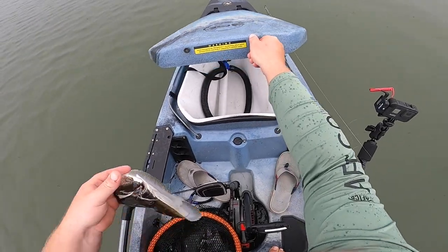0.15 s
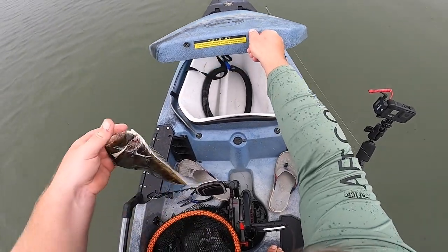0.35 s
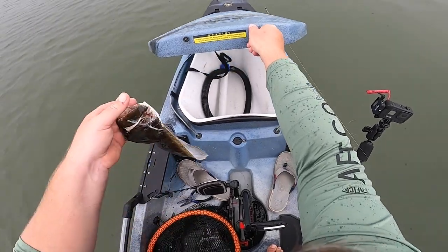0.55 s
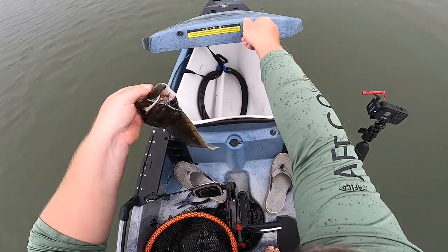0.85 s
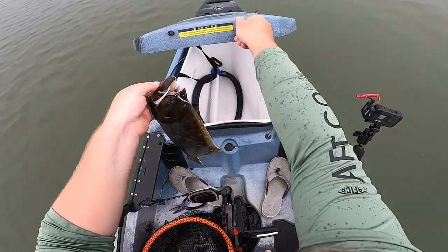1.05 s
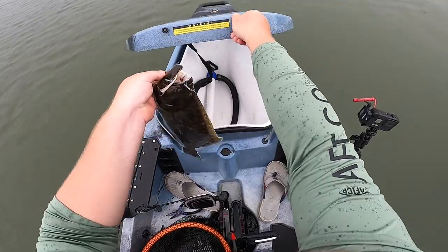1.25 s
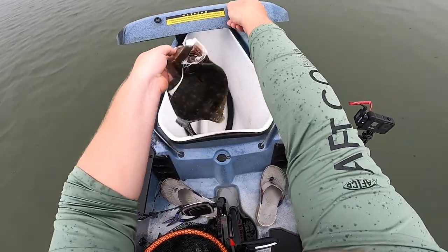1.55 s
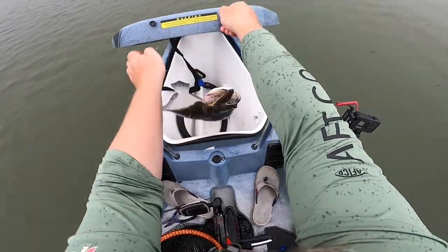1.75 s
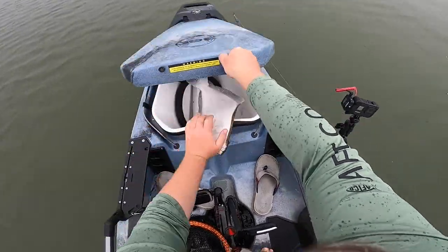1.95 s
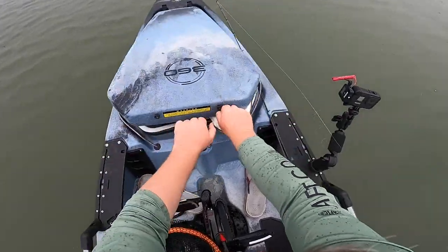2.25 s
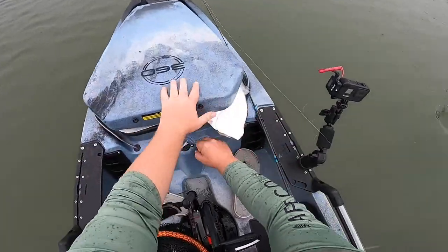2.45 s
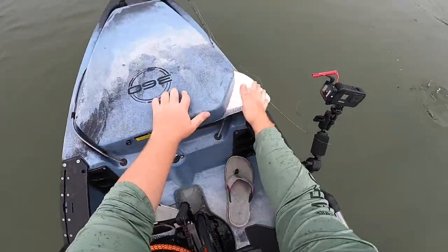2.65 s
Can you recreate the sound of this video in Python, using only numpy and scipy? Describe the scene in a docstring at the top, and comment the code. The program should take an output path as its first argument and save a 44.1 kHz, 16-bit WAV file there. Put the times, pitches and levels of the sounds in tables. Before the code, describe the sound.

A fish thumps into a plastic kayak hatch, close by. At first there is only a low, engine-like drone, which continues throughout, with faint water ticks and sleeve rustle. At about 1.7 seconds the fish lands with a hollow boom and wet, crackling slaps. From 2 seconds the lid bumps and rubs on the rim in quick, hollow knocks, clacking shut at about 2.7 seconds.

```python
"""A wet fish drops into the front hatch of a plastic kayak and flops about.
Its skin splats and crackles, and each blow booms in the hollow hull. The lid is lowered, bumps
and rubs on the rim, which makes it ring, and clacks shut. Sleeves rustle faintly before the drop.
All along, a low drone like a far engine lies over calm water that ticks on the hull."""
import sys
import numpy as np
from scipy import signal
from scipy.fft import rfft, irfft, next_fast_len
from scipy.io import wavfile
from scipy.ndimage import map_coordinates

SR = 44100
rng = np.random.default_rng(int(sys.argv[2]) if len(sys.argv) > 2 else 0)


def digitize_waveform(pressure):
    """Quantize a signal to 16-bit integers and store it at the path in sys.argv[1].

    Rows of a 2-D input are taken as channels; values are limited to [-1, 1].
    """
    field = np.atleast_2d(pressure).T
    bounded = np.clip(field, -1, 1)
    quanta = np.round(bounded * 32767).astype(np.int16)
    wavfile.write(sys.argv[1], SR, quanta)


N = 123479

# The drone. Each row: pitch in Hz, level in dB.
DRONE_TONES = [(47.5, -38), (92, -40.5), (125.5, -38), (329.5, -59)]
# Drips and small handling ticks. Each row: start in seconds, level in dB, pitch in Hz.
DRIPS = [(0.112, -47.5, 5900), (.365, -55.5, 6500), (.433, -52, 1910), (0.971, -53.5, 6800),
         (1.026, -52.5, 6060), (1.391, -44.5, 1660), (1.474, -49.5, 2800), (1.577, -45.5, 1240)]
# Sleeves rustling, the fish sliding, lid and fish rubbing. Each row: time in seconds, level in dB.
RUSTLE_LEVELS = [(.18, -67.5), (.3, -65), (.5, -75), (.72, -72), (.77, -64.5), (.94, -71.5), (1.15, -63),
                 (1.55, -68)]
SLIDE_LEVELS = [(1.59, -68), (1.65, -43.5), (1.69, -51.5), (1.74, -38), (1.82, -45.5), (1.88, -51),
                (1.94, -48), (1.96, -34.5), (2.06, -47.5), (2.105, -37.5), (2.16, -56), (2.25, -42),
                (2.285, -34.5), (2.335, -43.5), (2.41, -36), (2.48, -40), (2.56, -31), (2.625, -40),
                (2.65, -28), (2.7, -48), (2.74, -36.5), (2.8, -30.5)]
RUB_PRESSURE = [(1.69, -85), (1.74, -39), (1.88, -51), (1.94, -49), (1.96, -40), (2.03, -33.5), (2.09, -42),
                (2.17, -47.5), (2.24, -33), (2.39, -37.5), (2.42, -30), (2.52, -28), (2.6, -32.5),
                (2.7, -34), (2.8, -30.5)]
# Wet skin slapping and peeling off plastic. Each row: start in seconds, level in dB, fade in seconds.
# A fade, called t60 in the code, is the time a sound takes to drop by 60 dB.
SKIN_SPLATS = [(1.647, -38.5, 0.038), (1.6593, -37.5, 0.046), (1.7262, -23.5, 0.018), (1.805, -35.5, 0.09),
               (2.0012, -22.5, 0.06), (2.091, -35, 0.11), (2.106, -28.5, 0.033), (2.29, -34.5, 0.11),
               (2.355, -27.5, 0.025), (2.654, -40, 0.055), (2.79, -27.5, 0.048)]
# Sharp cracks of the fish hitting the tub, then lid and rim clacking.
# Each row: start in seconds, level in dB, pitch in Hz, fade in seconds.
SHARP_HITS = [(1.7097, -26.5, 1300, 0.044), (1.7198, -23, 1390, 0.057), (1.7256, -14.5, 1410, 0.022),
              (1.7314, -19, 1400, 0.022), (1.779, -31, 1106, 0.051), (1.8059, -25, 1190, 0.025),
              (1.8155, -24, 1140, 0.028), (1.844, -30, 1680, 0.029), (1.908, -35.5, 920, 0.032),
              (1.9991, -14.5, 2100, 0.028), (2.0, -19.5, 4000, 0.035), (2.063, -39.5, 1900, 0.064),
              (2.1035, -28, 2910, 0.05), (2.2226, -22, 1880, 0.024), (2.273, -20.5, 2800, 0.018),
              (2.291, -26.5, 3920, 0.032), (2.299, -32, 5070, 0.052), (2.3184, -22.5, 2160, 0.013),
              (2.346, -23.5, 1170, 0.045), (2.353, -29.5, 2260, 0.027), (2.3775, -18.5, 2380, 0.014),
              (2.408, -21, 1440, 0.046), (2.461, -24.5, 1470, 0.028), (2.55, -22.5, 2380, 0.023),
              (2.5904, -17.5, 3270, 0.023), (2.7233, -13.5, 2930, 0.029), (2.7245, -8.5, 1490, 0.031),
              (2.7752, -16, 1570, 0.053), (2.7871, -24.5, 3860, 0.017)]
# The fish landing in the tub under the hatch, and the lid bumping on the rim. Each row: start in seconds,
# boom in dB, boom pitch in Hz, boom fade in seconds, heave in dB, knock in dB, knock brightness in Hz.
FISH_FLOPS = [(1.7255, -11.5, 220, 0.097, -24, -12.5, 865), (1.7315, -2, 218, 0.024, -34, -15.5, 1240),
              (1.7425, -8.5, 175.5, 0.19, -10, -25, 900)]
LID_BUMPS = [(1.952, -20, 152, 0.034, -22, -17.5, 1960), (2.013, -30, 220, 0.14, -11, -21, 700),
             (2.096, -24.5, 422, 0.12, -36, -22.5, 1400), (2.229, -10, 192.4, 0.1, -11.5, -15, 800),
             (2.272, -17.5, 307, 0.071, -12.5, -20.5, 880), (2.407, -19, 160, 0.06, -8.5, -14.5, 1500),
             (2.429, -23, 190, .04, -19, -18.5, 1000), (2.4625, -13, 273, 0.07, -7.5, -12, 1440),
             (2.478, -21, 176, 0.066, -24, -14.5, 1110), (2.495, -8.5, 108, 0.08, -8.5, -21, 806),
             (2.519, -15, 190, 0.026, -20, -12, 1030), (2.557, -13, 154.4, 0.11, -23, -15.5, 1100),
             (2.577, -15, 210.5, 0.2, -14, -14, 980), (2.646, -12, 160, 0.16, -14, -17, 750),
             (2.726, -8.5, 139.3, 0.23, -28, -11.5, 394)]
# The notes (modes) of tub and lid. Each row: pitch in Hz, relative level in dB, fade in seconds.
TUB_MODES = [(371, 3.5, 0.047), (457, 2.5, 0.033), (596, 6.5, 0.03), (940, -1, 0.14), (1120, -3, 0.19),
             (1305, 3, 0.11)]
LID_MODES = [(238, -7, 0.11), (340, -2.5, 0.12), (443, -3, 0.062), (502, 0, 0.062), (630, -1.5, 0.12),
             (721, -5.5, 0.06), (848, -4, 0.094), (1029, -3.5, 0.05), (1196, -5.5, 0.029),
             (1440, -12, 0.037), (1526, -2.5, 0.033)]
# Presses and blows that ring one panel of the lid. Each row: start in seconds, level in dB, pitch in Hz.
PANEL_NOTES = [(2.2285, -14, 632), (2.478, -12, 643), (2.5195, -9.5, 633.3), (2.725, -17, 1480)]
# The tone colour of each noise. Each row: frequency in Hz, relative level in dB.
RUMBLE_COLOUR = [(15, -2), (28, 2.5), (60, -6), (80, -1), (135, -2.5), (160, -7.5), (230, -13),
                 (400, -24.5), (600, -39), (1200, -54.5), (3000, -100)]
AIR_COLOUR = [(150, -4), (500, 1), (1300, 7), (2200, -9), (4500, -14.5), (8000, -16), (11000, -39),
              (14000, -51)]
CLOTH_COLOUR = [(500, -15.5), (1400, 4), (3500, -7), (12000, -24.5)]
SWISH_COLOUR = [(2500, -26), (4200, -0.5), (5100, -8), (6100, 1), (7300, -19), (8600, -2.5), (9900, -22)]
SLIDE_COLOUR = [(200, -16.5), (900, 8), (2000, 7.5), (3800, 2.5), (8000, -11.5), (12000, -24), (15500, -31)]
SPRAY_COLOUR = [(300, 6), (1200, 12), (3000, -0.5), (6000, 4.5), (9000, -1.5), (12000, -11.5), (15500, -9)]
HULL_COLOUR = [(20, -2.5), (55, 2), (90, -0.5), (130, 4), (210, -0.5), (300, -19), (600, -54)]
THUD_COLOUR = [(100, -11.5), (300, 9), (1400, 8), (4000, -22.5), (12000, -60)]
# How alike left and right are, far off and close by. Each row: frequency in Hz, likeness (1 is the same).
FAR_LIKENESS = [(25, 0.26), (60, 0.87), (120, 0.99), (500, 0.97), (2000, 0.3), (8000, .2)]
NEAR_LIKENESS = [(100, 0.84), (2000, 0.94), (5000, 0.99), (12000, 0.12)]
# The balance of the two microphones. Each row: frequency in Hz, left minus right in dB.
MIC_BALANCE = [(100, 1), (2500, 0.5), (5500, -0.5), (10000, -4.5), (14000, -7)]

RUMBLE_DB, AIR_DB = -33, -59.5
TICKS_PER_S, TICK_DB, TICK_HZ, TICK_T60 = 8.3, -59, 1900, 0.017
SWISH_S, SWISH_HALF_S, SWISH_DB = 0.63, 0.087, -66.5
CRACKLES_PER_S, SLIPS_PER_S, GRIP_S = 1000, 420, 0.06
HULL_DB, HULL_GROWTH, HULL_REF_DB = 7, 0.89, -8
HEAVE_HZ, HEAVE_T60 = 59.6, 0.14
DECK_DB, DECK_T60, LEFT_LAG_S = -14.5, 0.048, 0.00004
ROLL_OFF_HZ, TOP_HZ = 13550, 15800


def amp(db):
    """Turn decibels into a gain."""
    return 10 ** (np.asarray(db) / 20)


def unit(x):
    """Scale a signal to an average size (rms) of 1."""
    return x / np.sqrt(np.mean(x ** 2) + 1e-20)


def along(points, hz):
    """Read between the rows of a frequency table, on a log scale."""
    freqs, values = np.transpose(points)
    return np.interp(np.log(hz + 1), np.log(freqs + 1), values)


def curve(rows):
    """Join the rows of a time table with straight lines."""
    return np.interp(np.arange(N) / SR, *np.transpose(rows))


def wobble(rate):
    """A smooth curve through `rate` random values a second."""
    return map_coordinates(rng.standard_normal(N // 100), [np.arange(N) * rate / SR])


def filtered(x, response):
    """Scale and delay each frequency of x by response(hz)."""
    n = x.shape[-1]
    padded = next_fast_len(n + SR // 4)
    return irfft(rfft(x, padded) * response(np.fft.rfftfreq(padded, 1 / SR)), padded)[..., :n]


def coloured(x, spectrum):
    """Give x a tone colour."""
    size = 4096
    cepstrum = irfft(np.log(amp(along(spectrum, np.fft.rfftfreq(size, 1 / SR)))))
    cepstrum[1:size // 2] *= 2  # folded so the filter rings only after a click, never before
    cepstrum[size // 2 + 1:] = 0
    kernel = irfft(np.exp(rfft(cepstrum)))
    return signal.fftconvolve(x, kernel / np.linalg.norm(kernel))[:len(x)]


def spread(mid, side, likeness):
    """Mix two unrelated signals into a left and right of the given likeness."""
    def weights(hz):
        turn = np.arccos(np.clip(along(likeness, hz), -1, 1)) / 2
        return np.array([np.cos(turn), np.sin(turn)])
    mid, side = filtered(np.array([mid, side]), weights)
    return np.array([mid + side, mid - side])


def rush(spectrum):
    """Steady, far-off stereo noise."""
    mid, side = [coloured(rng.standard_normal(N), spectrum) for _ in range(2)]
    return unit(spread(mid, side, FAR_LIKENESS))


def add(track, start, sound):
    """Mix a sound into the track at `start` seconds."""
    part = track[max(round(start * SR), 0):][:len(sound)]
    part += sound[:len(part)]


def age():
    """Seconds since a blow, up to a quarter second."""
    return np.arange(SR // 4) / SR


def fade(t60):
    """Die away by 60 dB every t60 seconds."""
    return amp(-60 * age() / t60)


def ring(hz, t60, rise_s):
    """One fading note with a soft start."""
    return np.sin(2 * np.pi * hz * age()) * fade(t60) * (1 - np.exp(-age() / rise_s))


def grains(rate, scatter_db):
    """Random clicks of uneven size, about `rate` a second."""
    size = amp(scatter_db * np.clip(rng.standard_normal(N), -2, 2)) * rng.choice([-1, 1], N)
    return unit(size * (rng.random(N) < rate / SR))


def background():
    """Wavering drone tones in a low rumble, under faint open air."""
    t = np.arange(N) / SR
    drone = np.zeros(N)
    for hz, db in DRONE_TONES:
        level = amp(db + 0.83 * wobble(5.72)) * np.sqrt(2)
        drone += level * np.sin(2 * np.pi * hz * t + 0.47 * wobble(7.0))
    rumble = amp(RUMBLE_DB + wobble(6.36)) * rush(RUMBLE_COLOUR)
    air = amp(AIR_DB + 0.66 * wobble(6.9)) * rush(AIR_COLOUR)
    return drone + rumble + air


def crack(centre_hz, t60, dull_hz=4600):
    """A sharp hit and its chatter; the longer it lasts, the clearer its pitch."""
    force = rng.standard_normal(len(age())) * fade(t60)
    force[0] = 0.54 * np.linalg.norm(force)  # the first hit
    width_hz = centre_hz / (136 * t60)
    resonance = lambda hz: 1j * hz / (centre_hz ** 2 - hz ** 2 + 1j * hz * width_hz)
    body = filtered(force, lambda hz: resonance(hz) / (1 + 1j * hz / dull_hz - (hz / dull_hz) ** 2))
    bright_edge = amp(-9.5) * unit(coloured(force, SPRAY_COLOUR))
    burst = unit(body) + bright_edge
    return burst * np.linalg.norm(fade(t60)) / np.linalg.norm(burst)


def water_ticks():
    """A few clearer drips and ticks among faint ripples against the hull."""
    out = np.zeros(N)
    ripples = [(when * N / SR, TICK_DB + 8 * (size - .5), TICK_HZ * 2 ** (2 * pitch - 1))
               for when, size, pitch in rng.random((int(TICKS_PER_S * N / SR), 3))]
    for start, db, hz in DRIPS + ripples:
        add(out, start, amp(db) * crack(hz, TICK_T60))
    return out


def sleeves():
    """Cloth and wet grip crackle as the fish is lifted; an arm swings out with a soft swish."""
    cloth = coloured(grains(900, scatter_db=5), CLOTH_COLOUR)
    rustle = amp(curve(RUSTLE_LEVELS) + 1.8 * wobble(45)) * cloth
    swell = np.exp(-((np.arange(N) / SR - SWISH_S) / SWISH_HALF_S) ** 4)
    return rustle + amp(SWISH_DB) * swell * coloured(rng.standard_normal(N), SWISH_COLOUR)


def wet_skin():
    """The fish splats and slides: tiny films of water snap in clumps."""
    splat_level = np.zeros(N)
    for start, db, t60 in SKIN_SPLATS:
        add(splat_level, start, amp(db) * fade(t60))
    droplets = grains(5000, scatter_db=7.0) + 0.73 * rng.standard_normal(N)
    spray = splat_level * unit(droplets * amp(1.3 * wobble(300)))
    clumps = amp(4 * wobble(220))
    crackle = grains(CRACKLES_PER_S, scatter_db=3.5) + 0.94 * rng.standard_normal(N)
    slide = amp(curve(SLIDE_LEVELS)) * unit(clumps * crackle)
    return coloured(spray, SPRAY_COLOUR) + coloured(slide, SLIDE_COLOUR)


def plastic_ring(modes, vary_db=3.0, vary_pitch=0.025):
    """Tapped plastic gives its notes and a dead thud, a little different at each spot."""
    notes = np.zeros(len(age()))
    for hz, db, t60 in modes:
        gain = amp(db + vary_db * rng.normal()) * rng.choice([-1, 1])
        notes += gain * ring(hz * (1 + vary_pitch * rng.normal()), t60, rise_s=0.000069)
    thud = coloured(rng.standard_normal(len(notes)) * fade(0.024), THUD_COLOUR)
    tap = notes + 2.26 * thud
    return tap / np.linalg.norm(tap)


def rubbing():
    """Uneven slips shake the hull and ring the lid, differently at each new grip on the rim."""
    pressure_db = curve(RUB_PRESSURE)
    slips = grains(SLIPS_PER_S, scatter_db=2.5) * amp(pressure_db + 1.8 * wobble(60))
    hull_gain = amp(HULL_DB + (HULL_GROWTH - 1) * (pressure_db - HULL_REF_DB))
    out = hull_gain * coloured(slips, HULL_COLOUR)
    for start in np.arange(RUB_PRESSURE[0][0], N / SR, GRIP_S):
        grip = slips[int(start * SR):int((start + GRIP_S) * SR)]
        add(out, start, signal.fftconvolve(grip, plastic_ring(LID_MODES)))
    return out


def sharp_hits():
    """The fish hits the tub, then the lid hits the rim: short cracks that also ring the lid."""
    out = np.zeros(N)
    for start, db, centre_hz, t60 in SHARP_HITS:
        burst = crack(centre_hz, t60)
        lid = signal.fftconvolve(burst, plastic_ring(LID_MODES))[:len(burst)]
        add(out, start, amp(db) * (burst + amp(-12.5) * lid))
    return out


def blows(rows, modes):
    """Each soft blow knocks the plastic, booms in the hollow and makes the whole hull heave."""
    out = np.zeros(N)
    for start, boom_db, boom_hz, t60, heave_db, knock_db, bright_hz in rows:
        force = 0.061 * rng.standard_normal(len(age())) * fade(0.042)
        force[0] += 1  # one push ahead of the faint chatter
        struck = signal.fftconvolve(force, plastic_ring(modes))[:len(force)]
        knock = filtered(struck, lambda hz: 1 / (1 + 1j * hz / bright_hz) ** 2)
        knock = amp(knock_db) * knock / np.std(knock[:SR // 100]) / 2
        boom = amp(boom_db) * ring(boom_hz, t60, rise_s=0.0028)
        heave = amp(heave_db) * ring(HEAVE_HZ, HEAVE_T60, rise_s=0.0069)
        add(out, start, knock + boom + heave)
    return out


def lid_panels():
    """The lid's flat faces ring with hollow notes."""
    out = np.zeros(N)
    for start, db, hz in PANEL_NOTES:
        add(out, start, amp(db) * ring(hz, t60=0.1, rise_s=0.00065))
    return out


def deck_echo(pair):
    """Add a short echo, with little bass, off the deck and arms."""
    tails = rng.standard_normal((2, len(age()))) * fade(DECK_T60) * (1 - np.exp(-age() / 0.0024))
    echo = signal.fftconvolve(pair.mean(axis=0)[None], tails / np.linalg.norm(tails[0]), axes=1)[:, :N]
    thin_echo = filtered(echo, lambda hz: 1j * hz / (900 + 1j * hz))
    return pair + amp(DECK_DB) * spread(*thin_echo, NEAR_LIKENESS)


def microphones(pair):
    """The left side hears slightly later, the right side brighter."""
    sides = np.array([[1], [-1]])
    delay = lambda hz: np.exp(-1j * np.pi * hz * sides * LEFT_LAG_S)
    return filtered(pair, lambda hz: amp(sides * along(MIC_BALANCE, hz) / 2) * delay(hz))


def scene():
    """The hatch at arm's length on open water; the fine crackle differs between left and right."""
    crackle = lambda: sharp_hits() + wet_skin() + water_ticks() + sleeves()
    body = blows(FISH_FLOPS, TUB_MODES) + blows(LID_BUMPS, LID_MODES) + lid_panels() + rubbing()
    hatch = spread(body + crackle(), crackle(), NEAR_LIKENESS)
    return microphones(deck_echo(hatch) + background())


def record(dry):
    """Round off the loudest peaks, dull the high treble and cut everything above TOP_HZ."""
    rounded = dry / (1 + np.abs(dry) ** 8) ** (1 / 8)
    return filtered(rounded, lambda hz: (hz < TOP_HZ) / (1 + (hz / ROLL_OFF_HZ) ** 20))


dry = scene()
out = record(dry)
digitize_waveform(out)
```